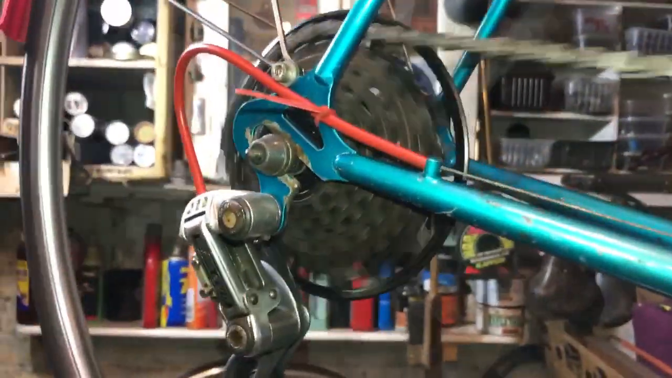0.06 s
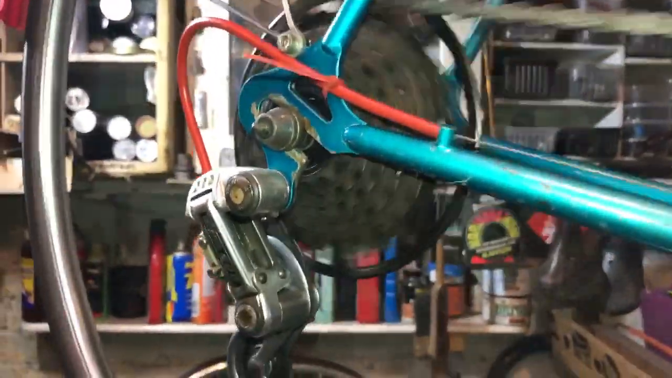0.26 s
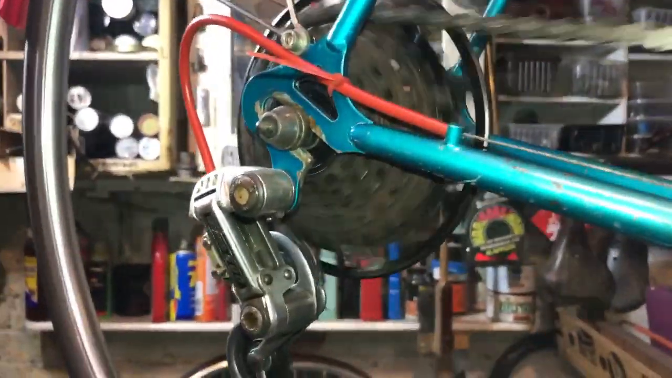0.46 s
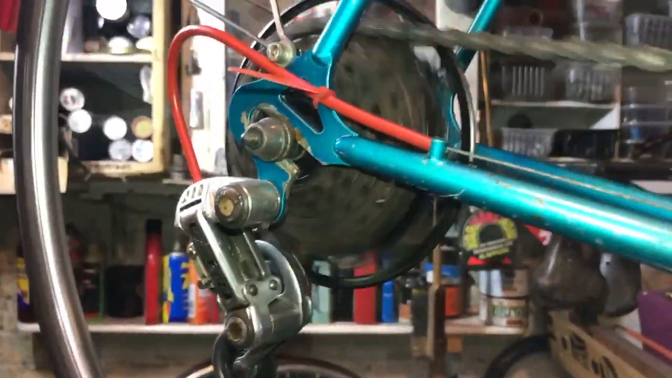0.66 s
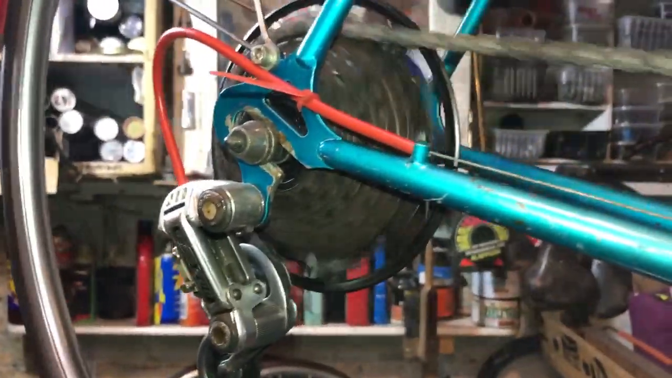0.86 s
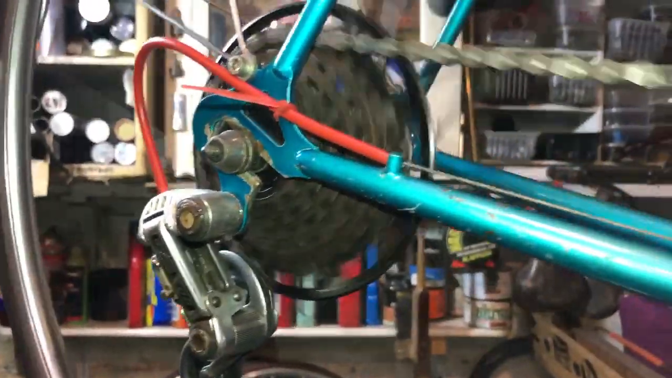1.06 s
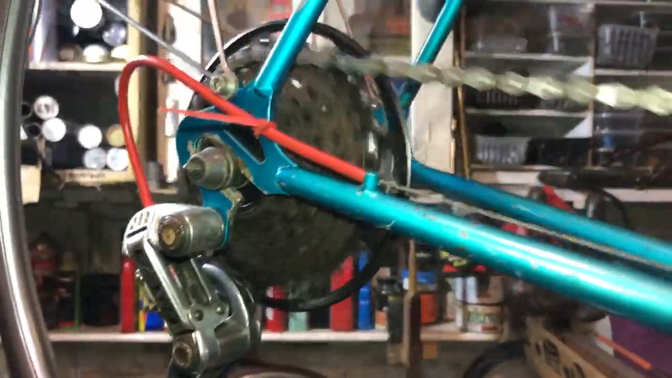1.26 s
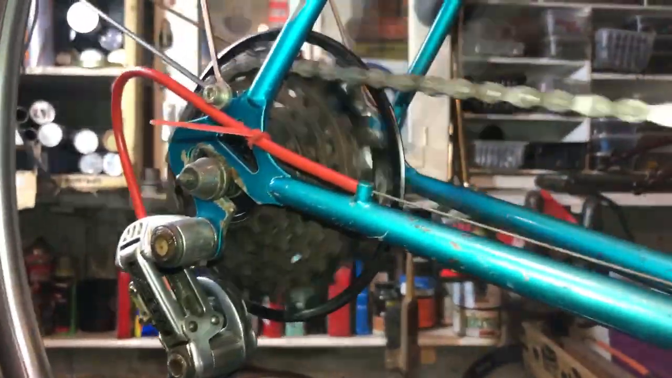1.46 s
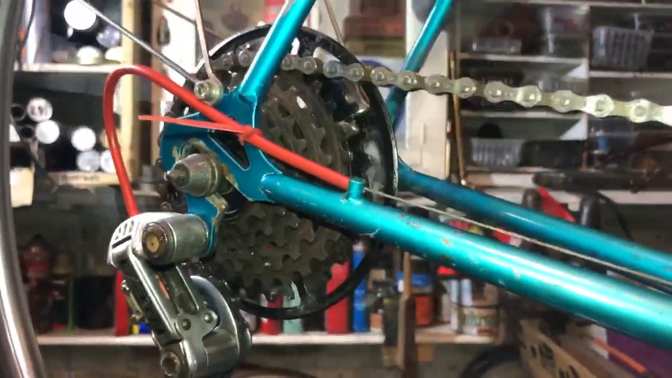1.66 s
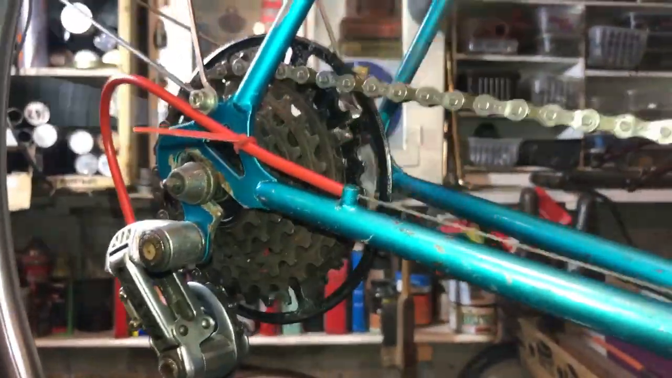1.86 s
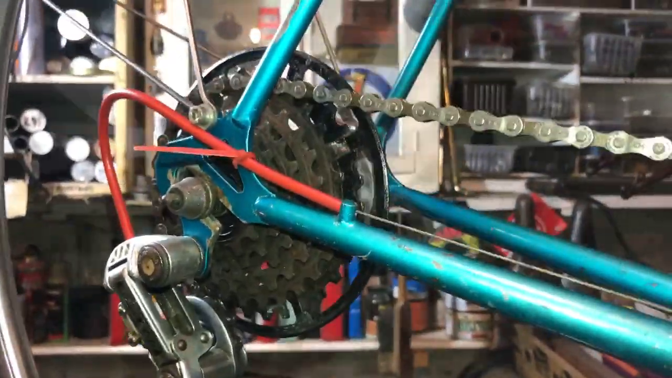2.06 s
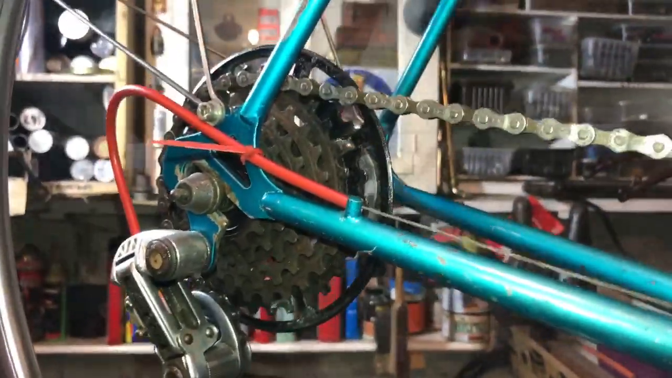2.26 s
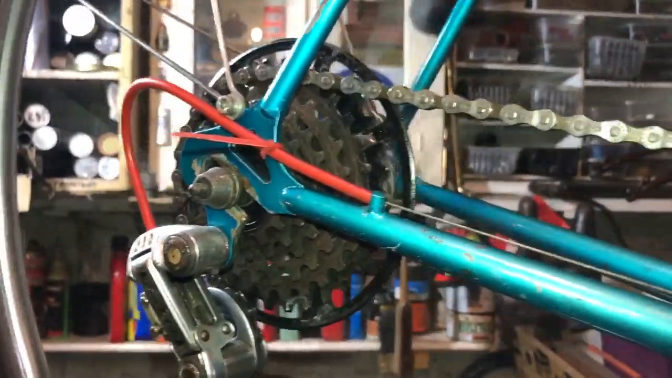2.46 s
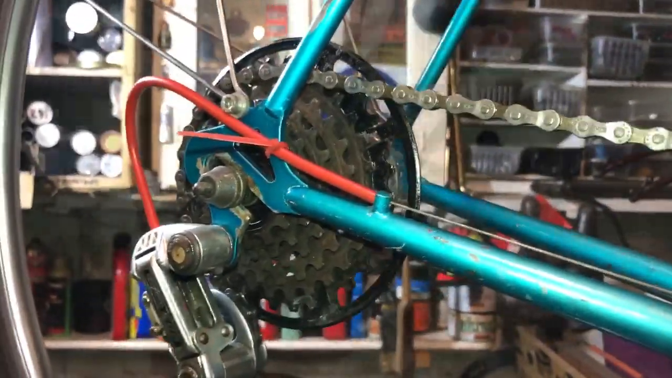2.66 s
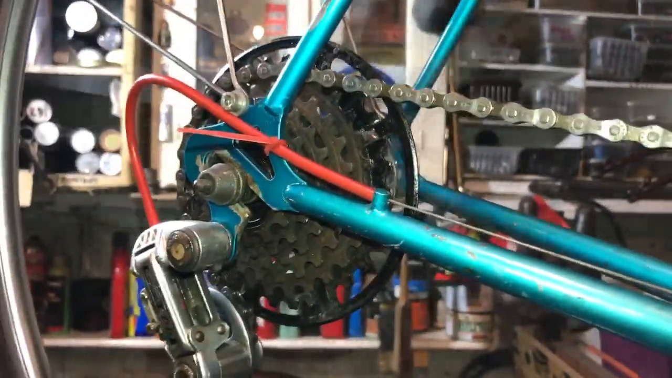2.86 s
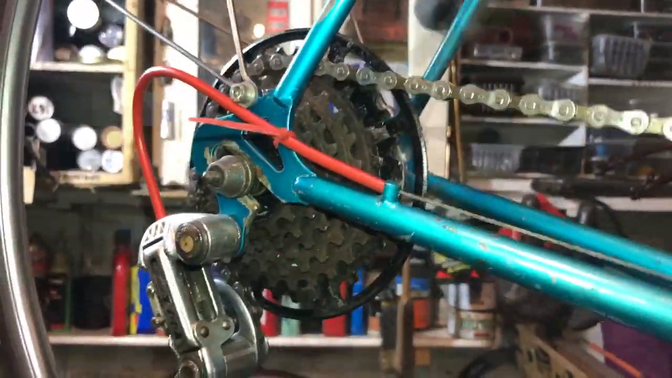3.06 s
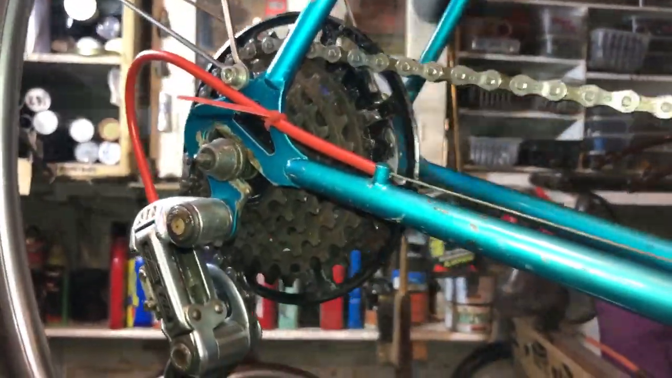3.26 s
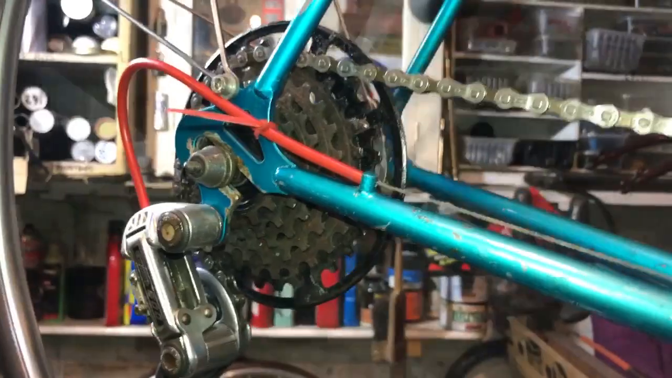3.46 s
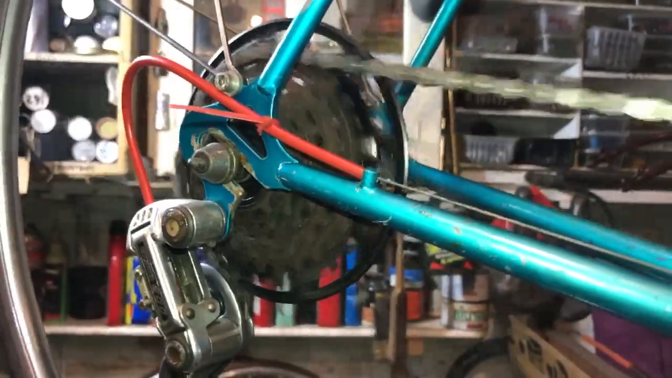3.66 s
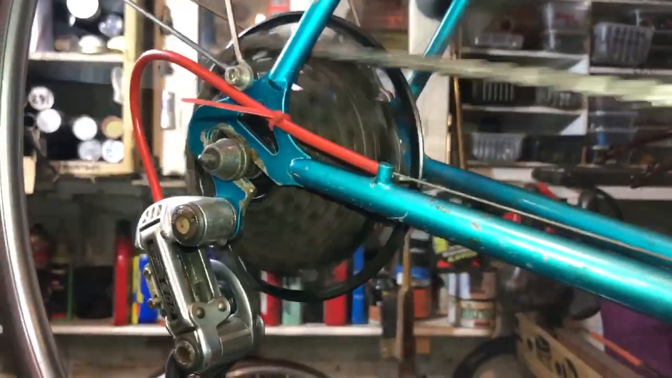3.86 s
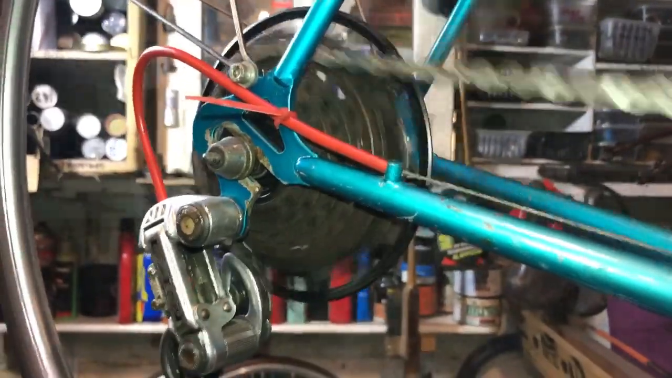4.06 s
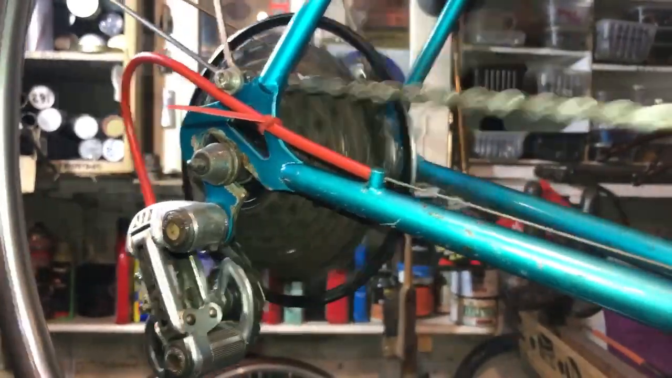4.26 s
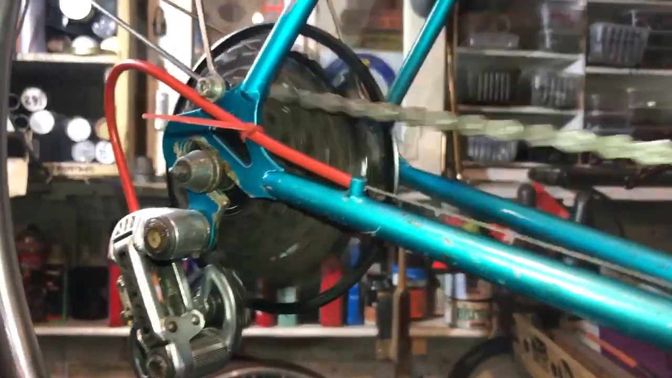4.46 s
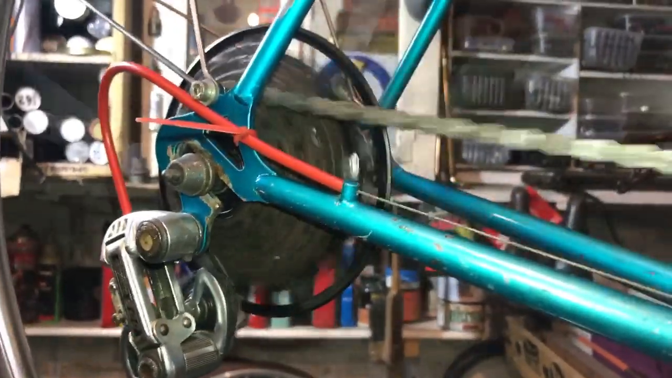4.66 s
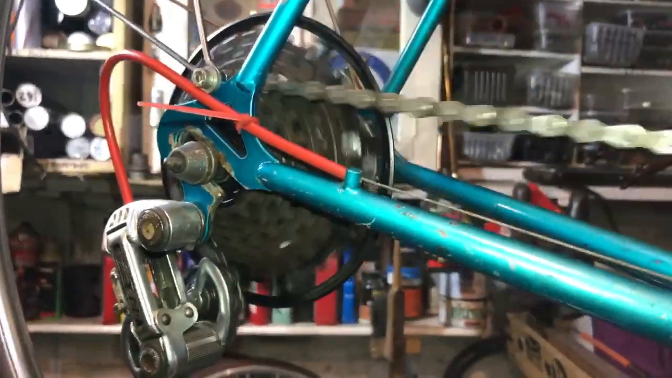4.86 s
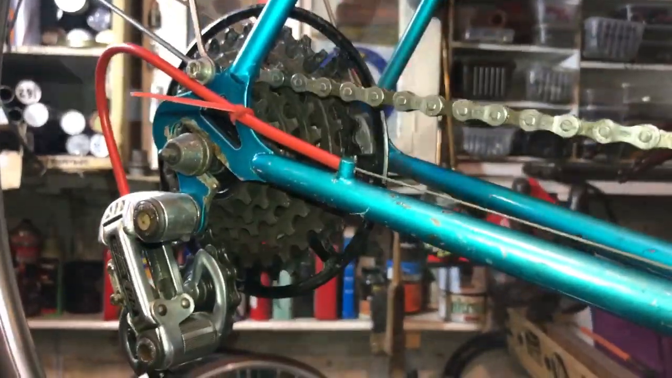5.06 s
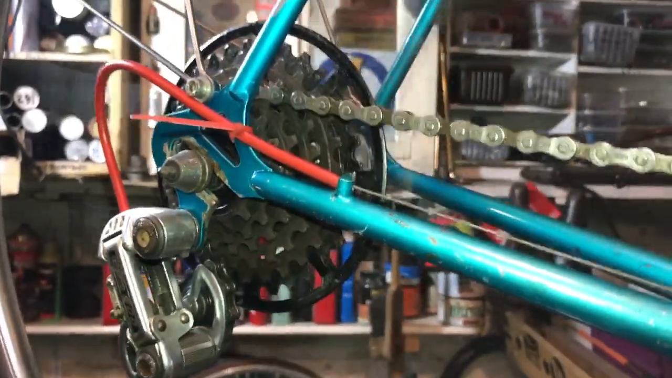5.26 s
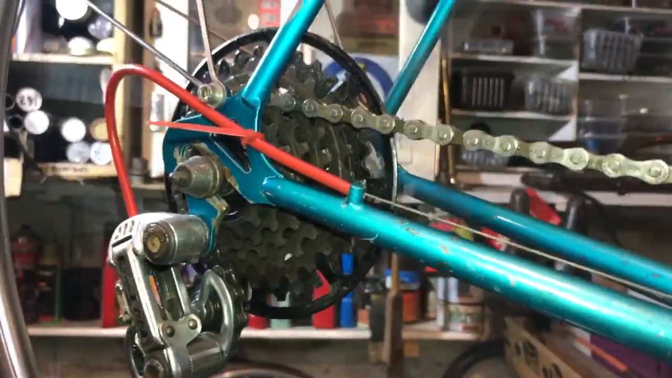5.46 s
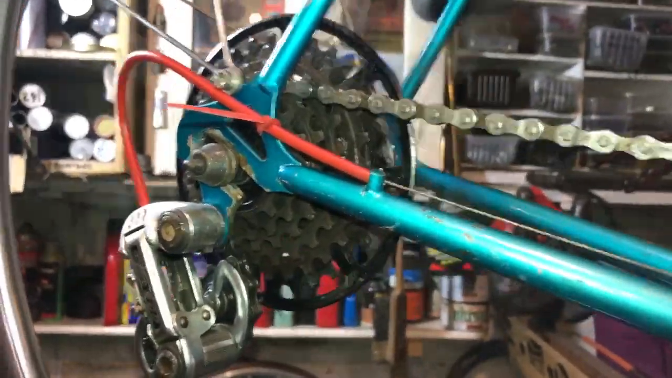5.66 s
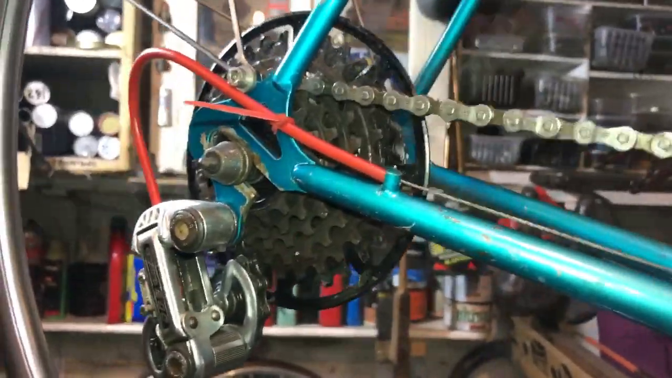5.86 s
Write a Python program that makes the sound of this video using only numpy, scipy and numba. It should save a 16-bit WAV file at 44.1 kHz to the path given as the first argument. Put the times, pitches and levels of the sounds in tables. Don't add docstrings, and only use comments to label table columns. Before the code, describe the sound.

A bicycle on a repair stand, heard very near in a small, fairly dry room. Light chain rattle and an early bright gear snap give way to steady ringing ratchet ticks, about twenty a second. A chain clack interrupts, then scraping and two heavier shifts knock the frame. After quiet link ticking, the quick freewheel clicks resume until the end, over low hiss and whirr.

```python
import sys
import numpy as np
from scipy import signal
from scipy.fft import rfft, irfft
from scipy.io import wavfile
from scipy.ndimage import uniform_filter1d
from numba import njit

SR = 44100
rng = np.random.default_rng(int(sys.argv[2]) if len(sys.argv) > 2 else 0)


def convert_level_to_amplitude(level_db):
    exponent = np.asarray(level_db, float) / 20
    return 10 ** exponent


def pcm_store(signal):
    levels = np.round(np.clip(np.atleast_2d(signal), -1, 1) * 32767)
    wavfile.write(sys.argv[1], SR, levels.astype(np.int16).T)


N = 260570

# ratchet teeth passed, time in seconds.
COASTS = [
    [(0, 1.1192), (1, 1.2578), (2, 1.3774), (3, 1.49), (4, 1.5708), (12, 1.9583), (20, 2.348), (25, 2.5918),
     (29, 2.7906), (30, 2.8325), (31, 2.899), (33, 2.9982), (43, 3.5003), (44, 3.5714)],
    [(45, 4.8627), (46, 4.9063), (49, 5.0316), (56, 5.3273), (61, 5.5406), (69, 5.8798)],
]
# frequency in Hz,
# change in dB.
SPELL_COLOUR = [
    [(4570, -0.5), (6690, 4), (12635, 2)],
    [(4570, -2), (6690, -0.5), (9190, 6), (12635, 5.5), (14500, -2.5), (15300, 5)],
]
# level in dB, swing in dB, swings per half turn, loudest tooth.
FACING = [(-22.5, 1.5, 1, 2), (-3.5, 2.5, 2, 2.76), (-0.36, 1, 2, 2.7)]


def freewheel():
    teeth_per_half_turn, latest_tooth = 10, 3.5
    pawl_db, faster_db_per_octave, tooth_scatter_db = -25.5, 1.5, 0.92
    lag_share, lag_swing, lag_scatter = 0.055, 0.02, 0.012
    swing_share, second_pawl_db, second_scatter_db = (1.4, 0.15), (-0.5, 1.5), 1
    bounce_s, bounce_db = 0.0045, -13
    out = 0
    for coast, depth, second_db, colour in zip(COASTS, swing_share, second_pawl_db, SPELL_COLOUR):
        tooth, first_s = steps(coast)
        gap_s = np.minimum(np.gradient(first_s), 0.14)
        chance = rng.standard_normal((len(tooth), 5)).T

        def swing(times, top):
            return np.cos(2 * np.pi * times * (tooth - top) / teeth_per_half_turn)

        lag = lag_share + lag_swing * swing(0.97, latest_tooth) + lag_scatter * chance[0]
        lag_s = np.clip(gap_s * lag, 0.001, 0.012)
        split_db = second_db + second_scatter_db * chance[1]
        first_db = pawl_db + 3 - faster_db_per_octave * np.log2(gap_s / 0.046)
        first_db = first_db - 10 * np.log10(1 + convert_level_to_amplitude(split_db) ** 2)
        pawls_db = np.r_[first_db, first_db + split_db]
        ranges_db = []
        for (base_db, swing_db, times, top), scatter in zip(FACING, chance[2:]):
            share = depth if times > 1.5 else 1
            facing_db = base_db + swing_db * share * swing(round(times), top)
            ranges_db.append(pawls_db + np.tile(facing_db + tooth_scatter_db * scatter, 2))
        low_db, mid_db, top_db = ranges_db
        s = np.r_[first_s, first_s + lag_s]

        bounce = rng.standard_normal((len(s), 4)).T
        rebound_db = np.array([low_db + 3, mid_db - 13.5, top_db - 26]) + bounce_db + 2.3 * bounce[1:]
        out = out + strike(s + bounce_s * convert_level_to_amplitude(6.8 * bounce[0]), *rebound_db, crack_t60=0.017)
        out = out + strike(s, low_db - 22.5, mid_db - 20.5, top_db - 26, crack_t60=0.021)
        out = out + strike(s, low_db - 10, mid_db - 10, top_db - 7, crack_t60=0.0025)
        out = out + stack(s, low_db - 4.5, mid_db - 9, top_db - 6,
                          scatter_db=3.5, linger_db=-22, colour=colour)
    return out


STACK_HZ = (1870, 2200, 2600, 3210, 4570, 4830, 5680, 6150, 6690, 7950, 8200, 8900, 9190, 9600, 10050)
STACK_TOP_HZ = (11550, 12200, 12635, 13100, 14230, 14400, 14620, 14850, 15160, 15400, 15550)
# level in dB, t60 in seconds.
STACK = [(-7, 0.088), (-2.5, 0.034), (-11.5, 0.066), (-12, 0.045), (-3, 0.057), (4.5, 0.016),
         (-31.5, 0.078), (-9.5, 0.014), (-5.5, 0.024), (-9, 0.033), (-8.5, 0.03), (-9.5, 0.021),
         (-1, 0.012), (-5, 0.025), (-16.5, 0.087), (-10.5, 0.024), (-22, 0.022), (-8, 0.023), (-17, 0.039),
         (-12, 0.021), (-4.5, 0.027), (2.5, 0.019), (2, 0.018), (-12, 0.023), (-4.5, 0.028), (-25, 0.022)]


def stack(s, low_db, mid_db, top_db, scatter_db, linger_db, colour=((0, 0),)):
    hz = np.r_[STACK_HZ, STACK_TOP_HZ]
    db, t60 = np.transpose(STACK)
    db = db + np.transpose([low_db, mid_db, top_db])[:, np.searchsorted((5300, 10800), hz)]
    db = db + sum(change_db * (abs(hz - f) < 350) for f, change_db in colour)
    db = db + scatter_db * rng.standard_normal(db.shape)
    return ring(s, hz, db, t60, detune=0.0051) + ring(s, hz, db + linger_db, 2.47 * t60, detune=0.0037)


# start in seconds, low, middle and treble level in dB.
HARD_LINKS = [(0.1334, -42.5, -40, -44), (0.2, -39, -42, -37), (0.321, -45, -35, -47),
              (0.3898, -40.5, -33, -47), (0.42, -47, -37, -50), (0.4587, -51, -46, -41),
              (0.5577, -70, -40, -38), (0.636, -58, -45, -37), (0.641, -59, -43, -37),
              (0.6942, -47, -41, -27.5), (0.735, -40, -36, -40), (0.7982, -67, -39, -38),
              (0.9341, -43, -43.5, -42), (1.4448, -45.5, -51, -42), (2.317, -57, -37, -42),
              (2.816, -40, -25, -24), (2.8369, -30.5, -23.5, -24), (3.6438, -38, -35, -39),
              (3.6924, -44, -39, -33), (3.768, -42, -31.5, -30.5), (3.8437, -42.5, -32, -38),
              (3.8535, -43, -44, -26), (3.9587, -53, -37, -30.5), (4.0244, -61, -35, -39),
              (4.3375, -59, -39, -46), (4.3429, -52.5, -37, -44), (4.449, -60, -48, -43),
              (4.668, -44, -36, -53), (4.7297, -64, -41, -39), (4.7709, -60, -44, -41)]


def hard_links():
    s, low_db, mid_db, top_db = np.transpose(HARD_LINKS)
    crack = strike(s, low_db + 3.5, mid_db - 4.5, top_db + 0.5, crack_t60=0.012)
    return crack + stack(s, low_db - 17, mid_db - 10, top_db - 12, scatter_db=3, linger_db=-20)


# chain links passed, time in seconds.
PEDALLING = [
    [(0, .4348), (15, .938), (16, .976), (17, 1.0194), (21, 1.21), (23, 1.3072)],
    [(0, 4.1866), (14, 4.7785)],
]


def rollers():
    low_mid_top_db, scatter_db, jitter_s = (-51.5, -57.5, -55), 5, 0.0025
    s = np.concatenate([steps(spell)[1] for spell in PEDALLING])
    chance = rng.standard_normal((len(s), 4)).T
    s = s + jitter_s * chance[0]
    db = np.array(low_mid_top_db)[:, None] + scatter_db * chance[1:]
    return strike(s, *db, crack_t60=0.021) + burst(s, db[0] - 6, 0.061, 840, 2000)


def loose_links():
    low_mid_top_db, tail_db, idle_db = (-68.5, -67, -62), 4.0, -12
    chance = rng.random((2200, 5)).T
    s = chance[0] * (N - 1) / SR
    size_db = -tail_db * np.log(1 - chance[1]) + idle_db * (1 - chain_runs(s))
    db = np.array(low_mid_top_db)[:, None] + np.minimum(size_db, 16) + 14 * (chance[2:] - 0.5)
    return strike(s, *db, crack_t60=0.0051)


# start in seconds, frequency in Hz, level in dB, t60 in seconds.
SINGS = [(2.838, 4600, -44, 0.15), (4.592, 12000, -50, 0.086), (.134, 13150, -56, 0.32),
         (.176, 13150, -44, .12)]


def tooth_tips():
    return sum(ring([s], [hz], np.array([[db]]), t60, detune=0.001) for s, hz, db, t60 in SINGS)


# start in seconds, treble level in dB,
# middle and low in dB re treble, ring in dB re treble.
SNAPS = [
    [(.2402, -16, 3, -3, -7), (.2463, -6.5, -5, -29, 2), (.2480, -18.5, 7, -32, 2),
     (.2505, -11, -2, -37, 3.5)],
    [(3.8835, -12, -5.5, -26, -1.5), (3.8853, -15, -1, -11.5, -11)],
    [(4.0945, -20, -7, -9, -17), (4.0990, -8.5, -7.5, -22, -17), (4.1053, -19, -19, -9, 0.5)],
]
SPROCKET_HZ = [(2300, 2993, 3526, 4581, 5609, 8070, 9990, 13140, 13930, 14560, 15140),
               (2422, 4097, 7973, 9400, 10630, 13080, 14080), (4043, 5690, 7445, 8086, 10130, 12680, 15160)]
# level in dB, t60 in seconds.
SPROCKETS = [
    [(-28, 0.15), (-30, 0.24), (-33.5, 0.34), (-18.5, 0.092), (-27.5, 0.076), (-0.5, 0.029), (-2.5, 0.025),
     (-28, 0.26), (-1, 0.031), (-6, 0.05), (-7, 0.06)],
    [(-18, 0.058), (-27, 0.18), (-18, .05), (4, 0.021), (-21, 0.045), (-12, 0.042), (-5, 0.04)],
    [(-5, 0.085), (-13.5, 0.12), (-19, 0.055), (-18.5, 0.24), (0, 0.033), (-14, .08), (-10, 0.082)],
]


def changes():
    out, rattle = 0, walk(120)
    for blows, hz, modes in zip(SNAPS, SPROCKET_HZ, SPROCKETS):
        s, db, mid_db, low_db, ring_db = np.transpose(blows)
        mode_db, t60 = np.transpose(modes)
        out = out + strike(s, db + low_db, db + mid_db, db, crack_t60=0.005)
        out = out + strike(s, db + low_db - 17, db + mid_db - 28.5, db - 29, crack_t60=0.12)
        for k in range(len(hz)):
            tone = ring(s, hz[k:k + 1], (db + ring_db)[:, None] + mode_db[k] - 6, t60[k], detune=0.002)
            out = out + tone * convert_level_to_amplitude(2.5 * np.roll(rattle, 997 * k))
    return out


# start and end in seconds, start and end level in dB,
# middle range in dB re treble.
SCRAPES = [(0.112, 0.208, -60, -44.5, 0), (0.218, 0.24, -49, -33, 4), (2.809, 2.855, -39, -42.5, 4),
           (3.672, 3.708, -52, -50, 0), (3.845, 3.853, -28, -46, -7), (3.867, 3.893, -17, -33, 0),
           (3.958, 3.969, -49, -40, -9), (3.96, 4.036, -52, -44, -5), (4.072, 4.101, -56, -28, 6),
           (4.227, 4.266, -51, -48, -6.5), (4.591, 4.65, -41.5, -62, -4)]
# centre in Hz, width in Hz, level in dB.
RUB = [(4420, 650, -6.5), (6000, 960, -4), (9560, 1300, 1.5), (11700, 620, -3), (12270, 340, -4),
       (14400, 1200, 1)]


def scrapes():
    t = np.arange(N) / SR
    top, mid = np.zeros(N), np.zeros(N)
    for start, end, start_db, end_db, mid_db in SCRAPES:
        gain = convert_level_to_amplitude(np.interp(t, [start, end], [start_db, end_db]))
        gain = gain * np.clip((t - start) / 0.013, 0, 1) * np.exp(-np.maximum(t - end, 0) / 0.0026)
        top += gain
        mid += gain * convert_level_to_amplitude(mid_db)
    out = 0
    for hz, width_hz, db in RUB:
        slips = convert_level_to_amplitude(1.6 * walk(250) + db - 7) * rng.standard_normal(N)
        out = out + band(slips * (mid if hz < 10800 else top), hz - width_hz / 2, hz + width_hz / 2)
    return out


# frequency in Hz, t60 in seconds, level in dB.
FRAME = [(59, 0.7, 0.5), (211, 0.12, -2.5), (269.3, 0.37, -9), (328, 0.15, -3.5), (583, 0.061, 3),
         (878, 0.14, -16)]
# start in seconds, level in dB of stand, long tubes, short tubes, loose clatter.
THUMPS = [(0.249, -56, -65, -47.5, -44), (.28, -56, -49, -40.5, -48), (1.075, -60, -48.5, -48.5, -57),
          (1.119, -51, -60, -51.5, -57), (1.167, -57, -57.5, -62, -65), (1.609, -70, -51, -55, -56),
          (2.317, -72, -47, -49, -59), (2.835, -61, -45, -47.5, -48), (3.693, -52.5, -36, -39.5, -43.5),
          (3.876, -60, -59, -61, -40), (3.884, -52, -35.5, -32, -41), (3.965, -64, -49, -49, -60),
          (4.029, -68, -54, -54, -62), (4.1, -59, -39.5, -38.5, -37), (4.63, -59, -41, -45, -47)]


def frame():
    hz, t60, mode_db = np.transpose(FRAME)
    thumps = np.array(THUMPS)
    s, db = thumps[:, 0], thumps[:, 1:]
    delay = rng.random((len(s), 4))
    modes_db = db[:, np.searchsorted((110, 450), hz)] + mode_db
    out = 0
    for k in range(4):
        out = out + ring(s + 0.027 * k * delay[:, k] / 2, hz, modes_db - 2.3 * k, t60, detune=0.036)
    return out + burst(s, db[:, -1], 0.22, 98, 1660) + burst(s, db[:, -1] - 2.5, 0.12, 940, 3600)


# frequency in Hz, level in dB per Hz.
AIR = [(15, -37), (25, -7), (149, -3), (195, -2), (263, -4), (326, 0), (463, -8), (591, -2), (754, -15),
       (1020, -9), (3720, -16), (9320, -10), (10750, -18), (12900, -8), (16000, -13)]
HUM_SHARE = (0.51, 0.26, 0.067, 0.17, 0.47, 0.88)


def background():
    split_hz, spoke_hz = (110, 1000, 4500), 4580
    groups = np.zeros((4, N))
    hz = np.fft.rfftfreq(N, 1 / SR) + 1
    air_hz, air_db = np.transpose(AIR)
    noise = rfft(rng.standard_normal(N)) * convert_level_to_amplitude(np.interp(np.log(hz), np.log(air_hz), air_db))
    hum = 1 + 2.1 / (1 + ((hz - spoke_hz) / 30) ** 2)
    for (mode_hz, *_), share in zip(FRAME, HUM_SHARE):
        hum = hum + share / (1 + ((hz - mode_hz) / 24) ** 2)
    noise = noise * hum
    for centre_hz in 25 * 2 ** np.arange(0, 10, 1 / 2):
        share = np.cos(np.pi / 2 * np.clip(2 * np.log2(hz / centre_hz), -1, 1)) ** 2
        flicker_db = 2.56 * walk(10) * (centre_hz < split_hz[1]) + 2.96 * walk(32)
        groups[3 - np.searchsorted(split_hz, centre_hz)] += irfft(noise * share, N) * convert_level_to_amplitude(flicker_db)
    return sum(g / np.std(g) * convert_level_to_amplitude(db) for g, db in zip(groups, layers_db(np.arange(N) / SR)))


# time in seconds, level in dB.
SHAKE = [(0.0, -57), (0.9, -59.5), (1.46, -62), (1.81, -55), (2.27, -59.5), (2.78, -55.5), (3.24, -60.5),
         (3.71, -57), (3.93, -50), (4.35, -60), (4.65, -60.5), (5.23, -53.5), (5.67, -59), (5.9, -59)]
# level in dB at mean shake, share of its swings, extra dB while the chain runs.
LAYERS = [
    (-60, 0.24, -0.5),
    (-62.5, 0.7, -.5),
    (-57, 1.08, -0.1),
    (-66.5, 0.064, 0.3),
]


def layers_db(s):
    at, shake_db = np.transpose(SHAKE)
    swing_db = np.interp(s, at, shake_db) - shake_db.mean()
    return [db + share * swing_db + extra_db * chain_runs(s) for db, share, extra_db in LAYERS]


def chain_runs(s):
    edges = [(0, COASTS[0][0][1]), (COASTS[0][-1][1], COASTS[1][0][1])]
    return sum(np.clip(np.minimum(s - a, b - s) / 0.048 + 1, 0, 1) for a, b in edges)


def steps(table):
    count, s = np.transpose(table)
    k = np.arange(count[0], count[-1] + 1)
    return k, np.interp(k, count, s)


def strike(s, low_db, mid_db, top_db, crack_t60):
    low = burst(s, low_db, crack_t60, 2000, 6000)
    mid = burst(s, mid_db, crack_t60, 6170, 9430)
    return low + mid + burst(s, top_db, crack_t60, 11200, 15100)


def burst(s, db, t60, lo_hz, hi_hz):
    fade = np.exp(-np.log(1000) / (t60 * SR))
    envelope = signal.lfilter([1], [1, -fade], train(s, convert_level_to_amplitude(db)))
    return band(envelope * rng.standard_normal(N), lo_hz, hi_hz)


def train(s, size):
    x = np.zeros(N)
    np.add.at(x, (np.asarray(s) * SR).astype(int), size)
    return x


def band(x, lo_hz, hi_hz):
    sos = signal.butter(2, [lo_hz, hi_hz], "band", fs=SR, output="sos")
    return signal.sosfilt(sos, x) / np.sqrt(2 * (hi_hz - lo_hz) / SR)


def walk(rate_hz):
    k = int(SR / rate_hz)
    held = np.repeat(rng.standard_normal(N // k + 1), k)
    return 1.34 * uniform_filter1d(uniform_filter1d(held, k), k)[:N]


def ring(s, hz, db, t60, detune):
    chance = rng.standard_normal((len(s), 2, len(hz)))
    loose_hz = np.array(hz) * (1 + detune * chance[:, 0])
    pole = np.exp(2j * np.pi * loose_hz / SR - np.log(1000) / (t60 * SR))
    start = (np.asarray(s) * SR).astype(np.int64)
    return ring_all(start, convert_level_to_amplitude(db) * np.exp(3j * chance[:, 1]), pole, N)


@njit
def ring_all(start, size, pole, n):
    out = np.zeros(n)
    for e in range(len(start)):
        for k in range(pole.shape[1]):
            z = size[e, k]
            for i in range(start[e], min(n, start[e] + int(-8 / np.log(abs(pole[e, k]))))):
                out[i] += z.imag
                z *= pole[e, k]
    return out


def room(x, t60, wet_db):
    t = np.arange(int(0.4 * SR)) / SR
    tail = rng.standard_normal(len(t)) * np.exp(-np.log(1000) * t / t60) * np.minimum(t / 0.013, 1)
    return x + convert_level_to_amplitude(wet_db) * signal.fftconvolve(x, tail / np.linalg.norm(tail))[:N]


def scene():
    chain = hard_links() + rollers() + loose_links() + tooth_tips()
    bike = freewheel() + chain + changes() + scrapes() + frame()
    return (room(bike, t60=0.12, wet_db=-19) + background())[None]


def top_cut(x):
    return signal.sosfilt(signal.butter(12, 16800, fs=SR, output="sos"), x)


def record(dry):
    x = signal.sosfilt(signal.butter(2, 16100, fs=SR, output="sos"), dry)
    x = signal.sosfilt(signal.butter(2, 46, "high", fs=SR, output="sos"), x)
    wide = signal.sosfiltfilt(signal.ellip(10, 0.1, 60, 16750, fs=SR, output="sos"), x)
    narrow = signal.sosfiltfilt(signal.ellip(10, 0.1, 60, 15900, fs=SR, output="sos"), x)
    highest = wide - narrow
    power = highest ** 2
    sharp = uniform_filter1d(power, 256) > 3 * uniform_filter1d(power, 2048)
    mix = narrow + uniform_filter1d(1.0 * sharp, 128) * highest
    return top_cut(np.clip(mix, -1, 1))


dry = scene()
out = record(dry)
pcm_store(out)
```